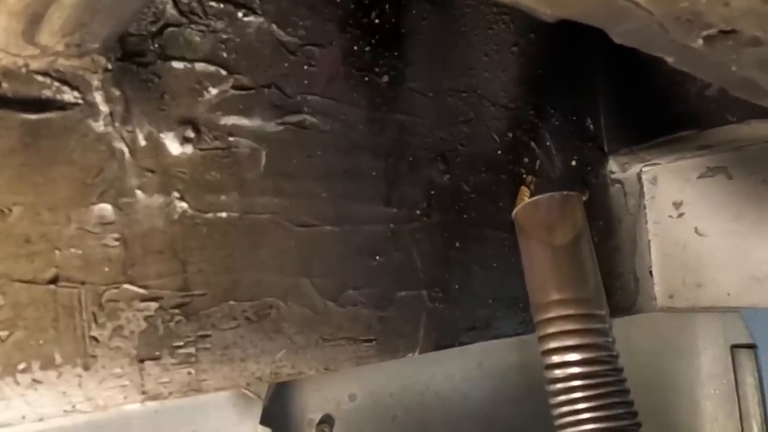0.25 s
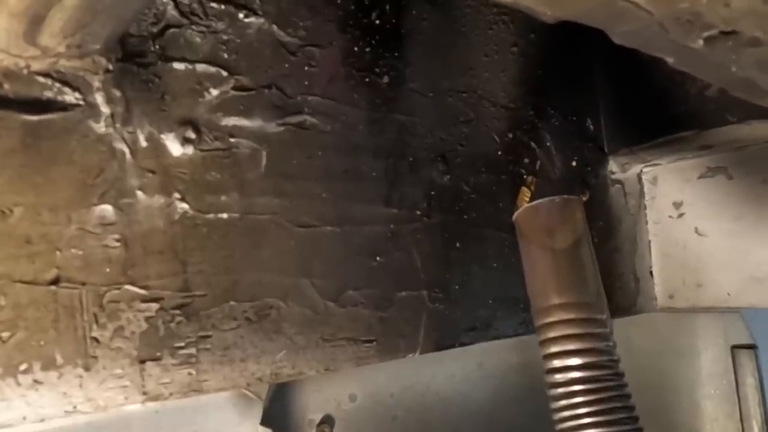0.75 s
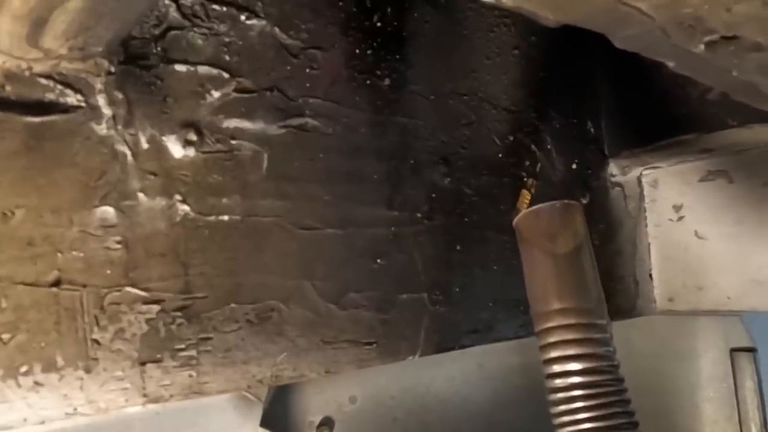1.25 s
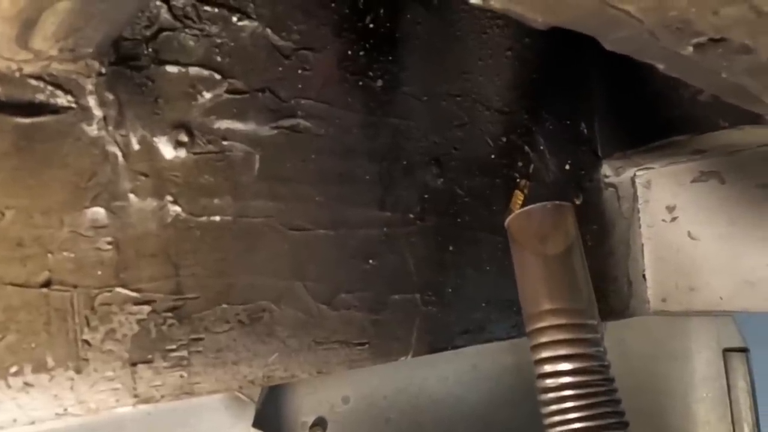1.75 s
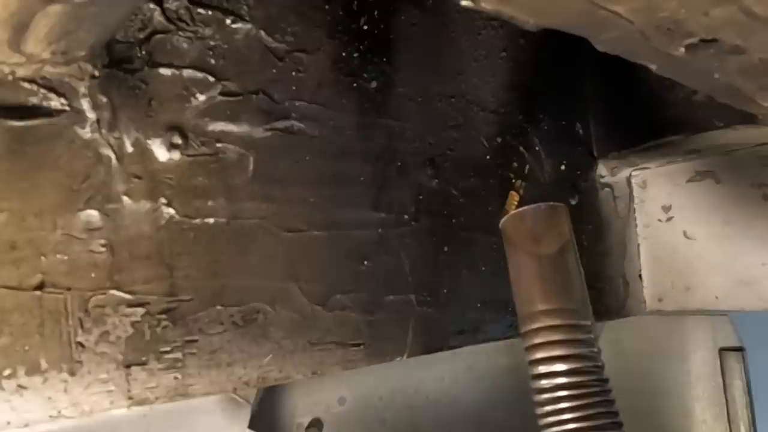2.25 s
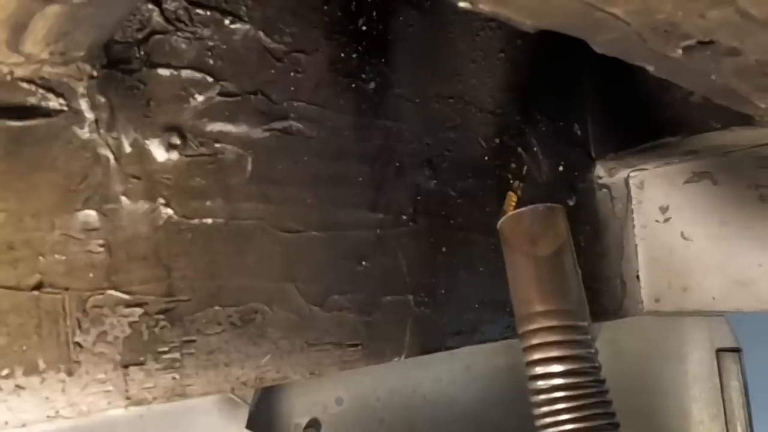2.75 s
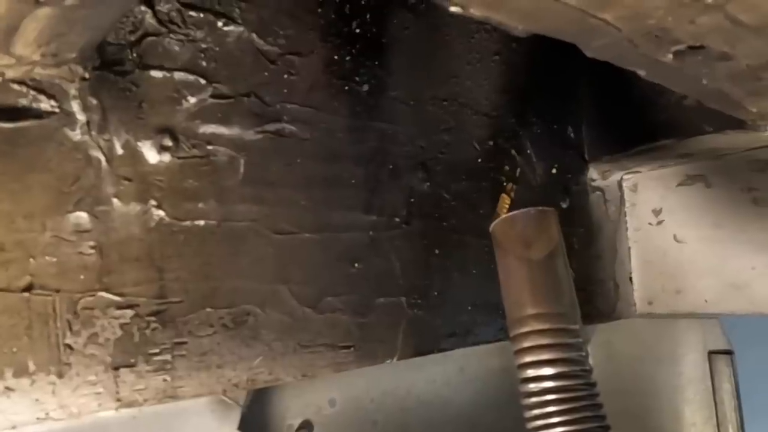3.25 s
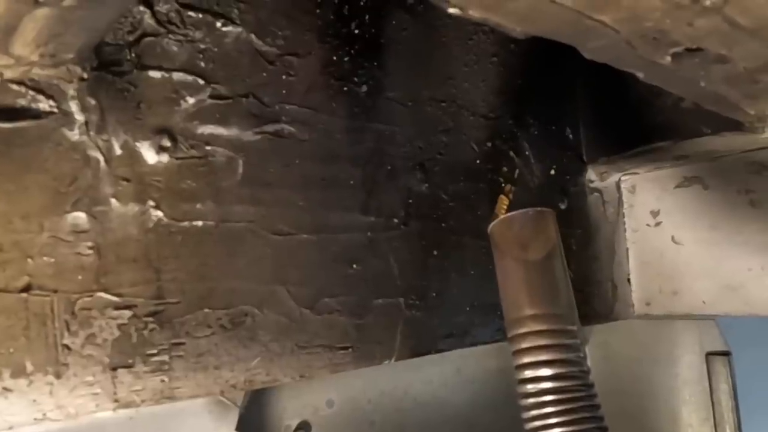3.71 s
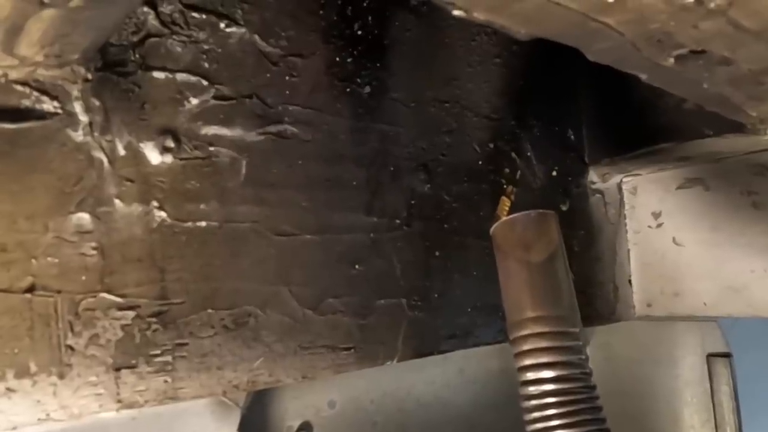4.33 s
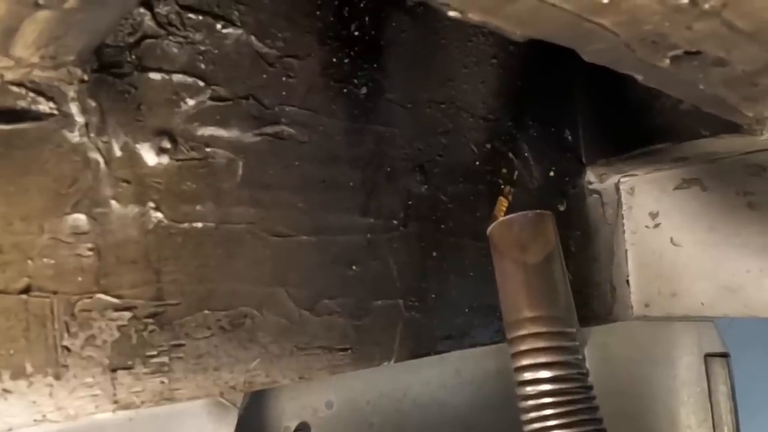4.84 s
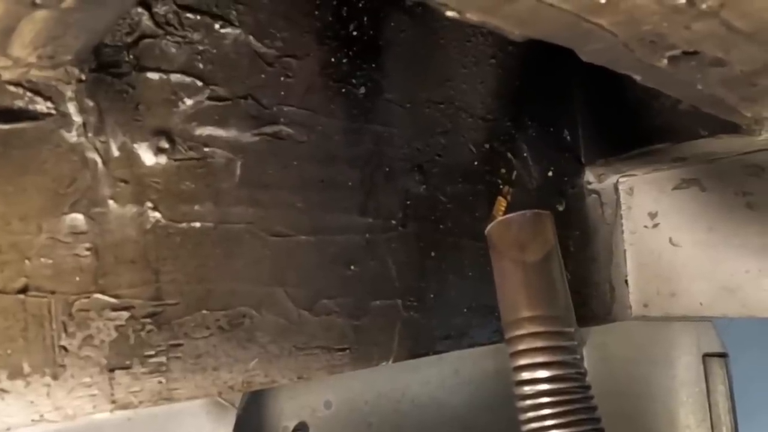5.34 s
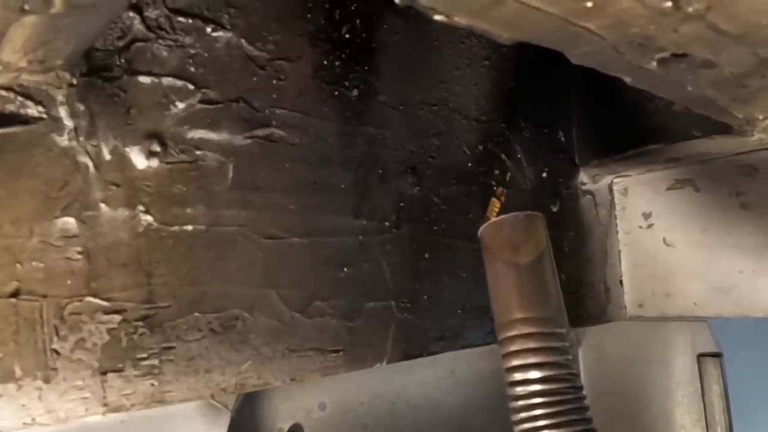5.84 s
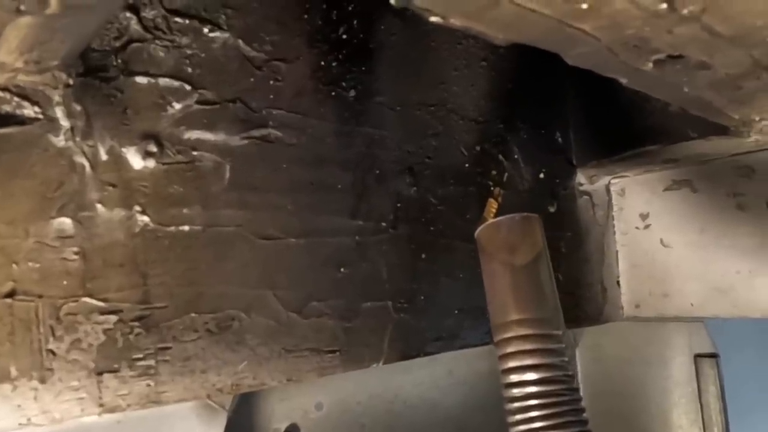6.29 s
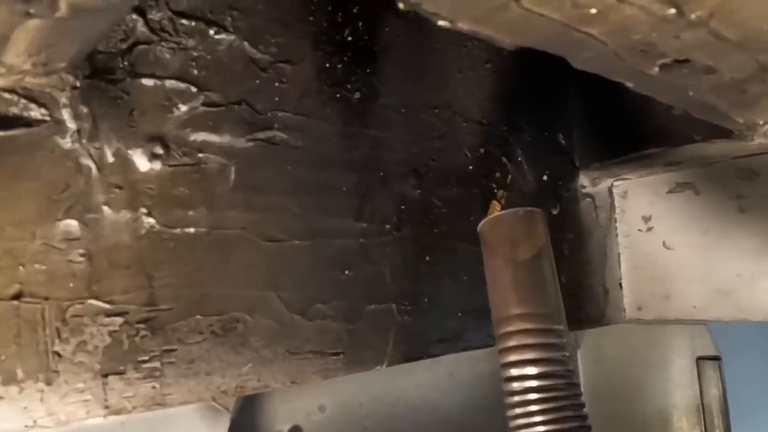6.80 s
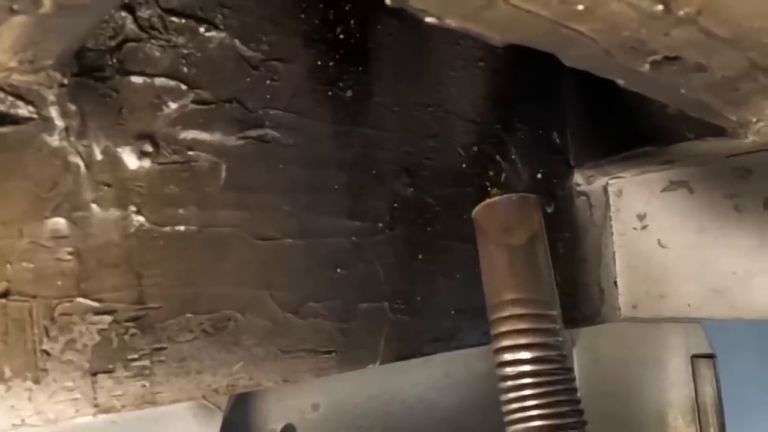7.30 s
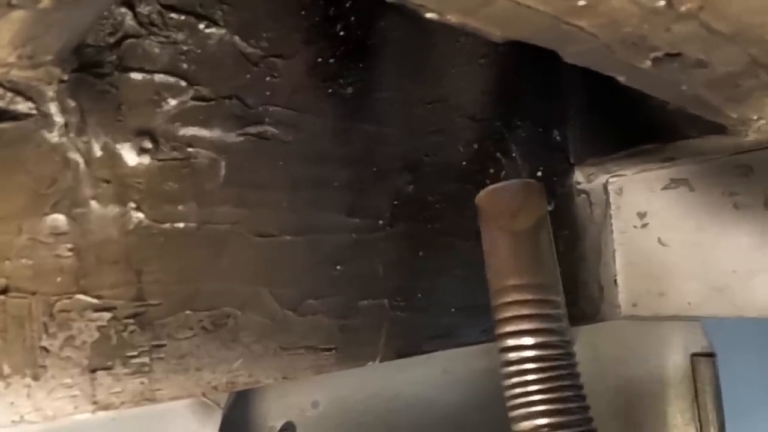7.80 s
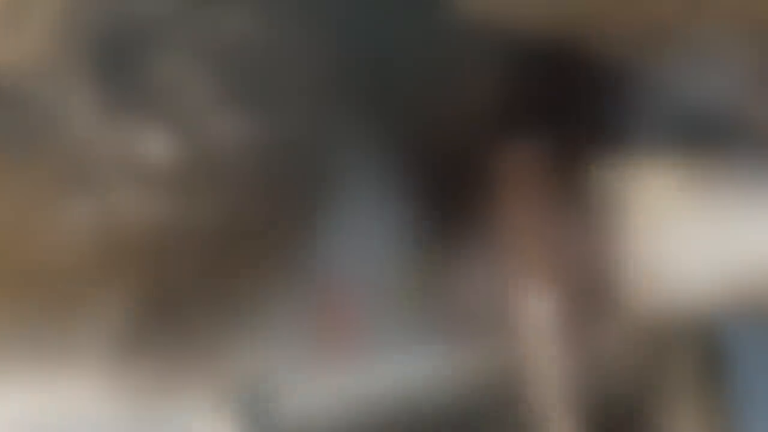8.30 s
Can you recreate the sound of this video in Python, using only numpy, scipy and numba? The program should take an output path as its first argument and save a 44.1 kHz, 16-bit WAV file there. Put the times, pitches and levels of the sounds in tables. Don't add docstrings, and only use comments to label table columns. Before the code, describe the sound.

A small diesel heater is already running at 0 s and continues throughout, heard close to its exhaust pipe outdoors with a hand-held two-microphone phone. The main sound is a low, turbulent combustion rumble around 120 Hz, starting with a brief surge and fluttering in short puffs and lulls. Hollow pipe resonances and a soft airy hiss sit above it, scattered slightly by nearby walls. A thin blower whine stays near 2.7 kHz with tiny drifts, swelling a little around 6 s. At 1.9 s hot metal gives one short, sharp tick. From about 6.9 s a hand faintly rustles on the phone; rubbing and scraping grow from 7.5 s. The hardest case knock comes at 8.04 s, followed by a small rattle and faint touches until 8.4 s, while the heater fades quickly but not completely to the end.

```python
import sys
import numpy as np
from scipy import signal
from scipy.fft import rfft, irfft
from scipy.io import wavfile
from scipy.ndimage import uniform_filter1d
from numba import njit

SR = 44100
rng = np.random.default_rng(int(sys.argv[2]) if len(sys.argv) > 2 else 0)


def convert_level_to_amplitude(level_db):
    exponent = np.asarray(level_db, float) / 20
    return 10 ** exponent


def master(y):
    cut = np.clip(np.atleast_2d(y).T, -1, 1)
    pcm = np.round(cut * 32767)
    wavfile.write(sys.argv[1], SR, pcm.astype(np.int16))


N = 377055
TIME_S = np.arange(N) / SR
BINS_HZ = np.fft.rfftfreq(N, 1 / SR)


def level(x, db):
    return x * convert_level_to_amplitude(db) / np.sqrt(np.mean(x ** 2))


def curves(table):
    s, *columns = np.transpose(table)
    return [np.interp(TIME_S, s, column) for column in columns]


def pan(x, db):
    return np.array([x * convert_level_to_amplitude(db / 2), x * convert_level_to_amplitude(-db / 2)])


@njit
def bandpass(x, hz, width):
    y, band, low = np.empty(len(x)), 0., 0.
    g, k = np.tan(np.pi * hz / SR), width / hz
    for i in range(len(x)):
        v = (band + g * (x[i] - low)) / (1 + g * (g + k))
        band, low, y[i] = 2 * v - band, low + 2 * g * v, k * v
    return y


def resonance(x, hz, width):
    hz, width = 1. * hz, 1.5 * width
    return bandpass(bandpass(x, hz, width), hz, width)


def walk(rate):
    k = int(SR / rate)
    held = np.repeat(rng.standard_normal(N // k + 1), k)
    return 1.3 * uniform_filter1d(uniform_filter1d(held, k), k)[:N]


def steady(x, span_s):
    k = int(span_s * SR)
    power = uniform_filter1d(uniform_filter1d(x ** 2, k), k)
    return x / np.sqrt(power + 1e-12)


def fade():
    late_s = np.maximum(TIME_S - 8.12, 0)
    return -1.5 * np.minimum(late_s / 0.072, 1) - 10 * late_s


# f/Hz, density/dB per Hz
YARD_SPECTRUM = [(30, -125), (150, -110), (300, -90), (600, -84), (1200, -83), (1900, -94), (3500, -97),
                 (5500, -103), (6500, -114), (8000, -109), (9000, -111), (10200, -120), (11800, -105),
                 (13500, -118)]


def yard(roar_db):
    noise = rfft(rng.standard_normal((2, N)))
    hz, density_db = np.transpose(YARD_SPECTRUM)
    spectrum_db = np.interp(np.log(BINS_HZ + 1), np.log(hz), density_db)
    colour = pan(convert_level_to_amplitude(spectrum_db), 6.5 * (BINS_HZ / 12000) ** 2)
    return irfft(noise * colour * np.sqrt(SR / 2), N) * convert_level_to_amplitude(roar_db + .6 * walk(1.4))


# f/Hz, width/Hz, gain/dB
WALL_ECHO = [(191.6, 15, -1), (266, 32, -3), (469, 15.4, -7.5), (1070, 21, -0.5), (1399, 13.6, -19),
             (1863, 62, -7), (2247, 54, -11), (3435, 64, -14), (5480, 40, -26), (8000, 130, -5),
             (8750, 130, 0), (10820, 150, -12), (13100, 220, -11), (2570, 13, -14), (3085, 7.8, 8.5),
             (5780, 87, -15)]


def wall_echo():
    return convert_level_to_amplitude(sum(db * np.exp(-((BINS_HZ - hz) / width) ** 2) for hz, width, db in WALL_ECHO))


# f/Hz, phase difference/rad
MIC_PHASE = [(0, 0), (1000, -.2), (2000, -.5), (3000, -1), (4200, -.7), (4800, -.1), (5300, -.5), (5700, 0),
             (22050, 0)]


def mic_spacing():
    phase = np.interp(BINS_HZ, *np.transpose(MIC_PHASE))
    return np.exp(.5j * phase * np.array([[1], [-1]]))


# t/s, hold/s, release/s, hiss level/dB, scrape level/dB
HAND_RUBS = [(6.865, .06, .1, -60, -56), (6.995, .02, .05, -67, -60), (7.548, .04, .12, -58, -46),
             (7.68, .22, .1, -75, -50), (7.885, .02, .05, -60, -48), (7.932, .17, .15, -64, -40.5),
             (7.984, .012, 0.056, -50, -39), (8.036, 0.0055, 0.027, -58, -26), (8.068, .012, .05, -59, -47),
             (8.136, .015, 0.11, -64, -55), (8.372, .012, .07, -61, -58)]


def hand():
    attack_s = 0.0051
    hiss_gain, scrape_gain = 0, 0
    for s, hold_s, release_s, hiss_db, scrape_db in HAND_RUBS:
        outside = np.maximum((s - TIME_S) / attack_s, (TIME_S - s - hold_s) / release_s)
        grip = convert_level_to_amplitude(-20 * np.clip(outside, 0, None))
        hiss_gain = hiss_gain + convert_level_to_amplitude(hiss_db) * grip
        scrape_gain = scrape_gain + convert_level_to_amplitude(scrape_db) * grip
    slips = rng.standard_normal(N) * convert_level_to_amplitude(3.5 * walk(300) + 1.5 * walk(70))
    hiss = resonance(slips, 8300., 4500.) + .5 * resonance(slips, 7800., 300.)
    scrape = resonance(slips, 2300., 500.) + 0.59 * resonance(slips, 1900., 1500.)
    scrape = scrape + 1.7 * resonance(slips, 670., 700.) + 5.6 * resonance(slips, 300., 200.)
    return pan(hiss_gain * level(hiss, 0) + scrape_gain * level(scrape, 0), 1.1)


# f/Hz, width/Hz, level/dB
SHEET_METAL = [(2330, 380, 2), (3500, 320, 6), (3950, 300, 2.5), (4300, 220, -6), (6350, 810, -17),
               (7730, 170, -8), (900, 300, -4), (9700, 760, -36)]
# f/Hz, width/Hz, level/dB
PHONE_CASE = [(350, 380, -4), (950, 500, 1.5), (1810, 330, 8), (2770, 730, -7), (3700, 1100, 0.5),
              (5200, 1150, -10.5), (7100, 2400, -20), (10500, 3300, -36)]
# f/Hz, width/Hz, level/dB
LOOSE_PART = [(2890, 100, .6), (7700, 300, -16), (11000, 2500, -22)]
# t/s, peak level/dB, t60/s, brightness/dB per octave, left minus right/dB
KNOCK_EVENTS = [
    (1.946, -13, 0.041, -0.8, -1.5),
    (7.888, -44, .04, 3, 5),
    (7.984, -45, .06, 12, 2.5),
    (8.038, -15, .045, 1.5, 2.5),
    (8.07, -27, .035, -5.5, 6),
    (8.139, -42, .04, 7, 2.5),
    (8.374, -43, .04, 1.5, 2.5),
]
STRUCK = [SHEET_METAL, PHONE_CASE, PHONE_CASE, PHONE_CASE, LOOSE_PART, PHONE_CASE, PHONE_CASE]


def knocks():
    out, t = np.zeros((2, N)), np.arange(SR // 8) / SR
    lowpass = signal.butter(4, 13000, fs=SR, output="sos")
    for body, (s, db, t60, bright_db, pan_db) in zip(STRUCK, KNOCK_EVENTS):
        decay = np.exp(-np.log(1000) * t / max(t60, .005))
        burst = rng.standard_normal(len(t)) * np.minimum(t / 0.0018, 1) * decay
        burst[SR // 1000] += 4.
        ring = 0
        for hz, width, mode_db in body:
            ring = ring + convert_level_to_amplitude(mode_db + bright_db * np.log2(hz / 4000.)) * resonance(burst, hz, width)
        ring = signal.sosfilt(lowpass, ring)
        i = int(s * SR)
        out[:, i:i + len(t)] += pan(ring * convert_level_to_amplitude(db) / np.abs(ring).max(), pan_db)[:, :N - i]
    return out


BLADES = 41
# t/s, blade tone f/Hz, blade tone swell/dB
BLOWER_SPEED = [(0, 2737, -.5), (.5, 2739.5, -.5), (1.5, 2733.5, -.5), (2, 2734, -2.5), (2.5, 2736.5, 0),
                (3.5, 2728, 1), (4.5, 2744, 0), (5.5, 2743, 2), (6.1, 2746, 3.5), (6.9, 2738, 2),
                (7.2, 2736, -1), (7.5, 2735.5, -2), (7.8, 2735, -7), (8.55, 2736, -7)]


def blower_speed():
    blade_hz, blade_db = curves(BLOWER_SPEED)
    return 2 * np.pi * np.cumsum(blade_hz / BLADES) / SR, blade_db


ORDERS = [1, 4, 8, 9, 11, 20, 21, 22, 23, 26, 29, 31, 32, 33, 35, 38, 40, 41, 42, 43, 44, 45, 46, 47, 54,
          65, 66, 73, 78, 99]
# level/dB, left minus right/dB, change at the speed step/dB
ORDER_LEVELS = [(-34.5, .1, .1), (-53, -1.4, .1), (-56, 3, .1), (-58, 1.1, .1), (-62, -.3, .1),
                (-45.4, -2.7, .1), (-50, -2.3, .1), (-47, -1.2, .1), (-49, 1.6, .1), (-58, -1.4, .1),
                (-65, -.2, .1), (-64, .4, .1), (-58, 2.8, .1), (-61, 3, .1), (-63, -.3, .1), (-56, 1.1, -1),
                (-55, 1.6, 0), (-44.2, 2.6, 0), (-50.3, 1.3, 0), (-49.5, 3, -4), (-50.5, -.1, 4),
                (-54.7, .4, 0), (-60, .6, 0), (-63.5, .6, 0), (-71.5, -1.6, 0), (-66.5, 0, 0),
                (-69, 1.9, 0), (-73, 0, 0), (-75, -1.7, 0), (-72, 1.8, 0)]


def blower(turn, blade_db):
    speed_step_s = 4.35
    out, step = 0, np.tanh((TIME_S - speed_step_s) / .12) / 2
    for order, (db, pan_db, step_db) in zip(ORDERS, ORDER_LEVELS):
        swell_db = blade_db if order == BLADES else 0
        drift_db = step * step_db + 0.32 * walk(2.85) + swell_db
        glide_rad = -.8 * (order - BLADES) ** 2
        line = np.sqrt(2) * convert_level_to_amplitude(db + drift_db) * np.sin(order * turn + glide_rad)
        out = out + pan(line, pan_db * (order > 1))
    return out


# t/s, rise/dB
FLAME_SURGES = [(0, 12.5), (.25, 3), (.47, 3.5), (.72, 5.5), (1.35, 1.5), (1.43, 3.6), (1.67, 6),
                (3.52, 2.4), (4.46, 3.6), (4.6, 2.5), (4.71, 3), (6.17, 4), (6.55, 5), (6.89, 3.7)]
# t/s, drop/dB, half length/s
FLAME_LULLS = [(0.07, -3, 0.044), (0.294, -7, 0.011), (.4, -1.5, .03), (0.781, -9, 0.018),
               (0.977, -1.5, .05), (1.273, -1.5, .07), (1.385, -4, 0.015), (1.51, -6, .05),
               (1.727, -6, 0.071), (2.08, -8, 0.026), (2.183, -5, 0.034), (3.11, -5, .022),
               (3.207, -10, 0.019), (3.575, -3, 0.022), (3.802, -4.5, 0.032), (3.903, -5, 0.028),
               (4.54, -2, 0.032), (4.66, -3, .025), (4.922, -3, .1), (5.855, -5.6, .055),
               (6.106, -3.1, 0.033), (6.24, -3.6, 0.11), (6.457, -3, 0.037), (6.846, -6, 0.016),
               (7.194, -8, 0.026), (7.923, -2.5, 0.027)]


def surging():
    rumble_db, surge_s = -21, 0.015

    def bump(s, db, half_s):
        return db * np.exp(-((TIME_S - s) / half_s) ** 2)

    surges = sum(bump(s, db, surge_s) for s, db in FLAME_SURGES)
    return rumble_db + surges + sum(bump(*lull) for lull in FLAME_LULLS) + fade()


# t/s, roar level/dB, facing/dB
FLOW_AND_AIM = [(0, 1.3, 4), (.7, 0.1, 3.5), (1.4, 1.05, 3), (2.1, 0.34, -1), (2.8, 1.6, -2), (3.5, 1.5, 0),
                (4.2, 0.3, -.6), (4.9, 0.8, 2.4), (5.6, 1.2, -2), (6.4, 1.74, 1), (7.1, 0.5, -1),
                (7.65, 0.8, 1), (8.1, 3, 1)]


def flow():
    roar_db, air_db = curves(FLOW_AND_AIM)
    hiss_db = 0.08 - 0.13 * air_db + 0.46 * fade()
    return roar_db + fade(), hiss_db, air_db


# f/Hz, width/Hz, level/dB, left minus right/dB
PIPE_MODES = [(56.7, 31, -41, -14), (119.9, 32.1, -22, -4), (157.6, 50, -35.5, -1.7),
              (225.8, 14, -42, -1.5), (315, 81, -43.5, -2), (406.5, 56.5, -38, -2.5),
              (567, 236, -46.5, 2.5), (812, 44, -49.5, -2), (948, 97, -48, -1.1), (1152.6, 16, -52, 10.5),
              (1280.3, 77, -36, -4), (1447, 140, -41, 4), (1691, 168, -45, -6.5), (2160, 100, -53, 2.5),
              (2430, 440, -51, 3), (2843, 360, -48, -4), (3273, 285, -54, 6.5), (3710, 250, -67, -22),
              (4610, 520, -53, 3.5), (5014, 29, -64.5, -4), (5430, 320, -57.5, -5), (6020, 230, -60.5, 0.5),
              (6420, 730, -59, 2), (7390, 890, -65.5, 5.5), (8310, 380, -73, -2), (10600, 720, -75.5, -6),
              (9730, 1300, -78.5, 11), (11840, 1200, -74, 7)]


def flame(turn, roar_db, hiss_db, air_db):
    out, rumble, flutter = 0, 0, walk(14)
    throb = np.cos(turn)
    for hz, width, db, pan_db in PIPE_MODES:
        ring = level(resonance(rng.standard_normal(N), hz, width), db)
        if 90 < hz < 190:
            rumble = rumble + ring
            continue
        if hz < 3400:
            swell_db = roar_db
        elif hz < 11000:
            swell_db = roar_db + hiss_db * hz / 5000
        else:
            swell_db = roar_db + air_db
        treble = np.clip(hz / 7200.0, 0, 1)
        wobble_db = 0.79 * walk(1.284) + treble * (0.21 * flutter + 1.14 * walk(25) + 0.98 * throb)
        out = out + pan(ring * convert_level_to_amplitude(swell_db + wobble_db), pan_db * (hz > 90))
    return out + steady(rumble, 0.082) * convert_level_to_amplitude(surging() + 0.3 * walk(12))


def scene():
    turn, blade_db = blower_speed()
    roar_db, hiss_db, air_db = flow()
    lead = mic_spacing()
    air = rfft(flame(turn, roar_db, hiss_db, air_db)) * lead + rfft(yard(roar_db + hiss_db))
    sharp = rfft(blower(turn, blade_db) * convert_level_to_amplitude(roar_db) + knocks()) * lead
    return irfft(air * wall_echo() + sharp, N) + hand()


def band_limit(x):
    return signal.sosfilt(signal.butter(12, 14900, fs=SR, output="sos"), x)


def record(dry):
    return band_limit(dry)


dry = scene()
out = record(dry)
master(out)
```